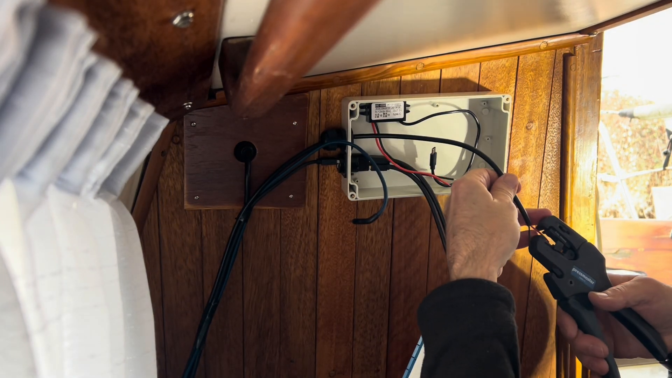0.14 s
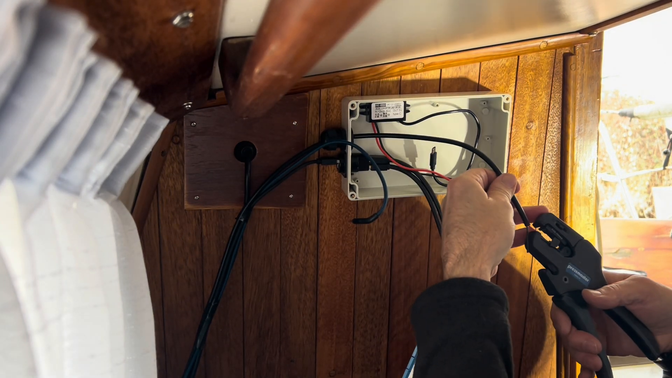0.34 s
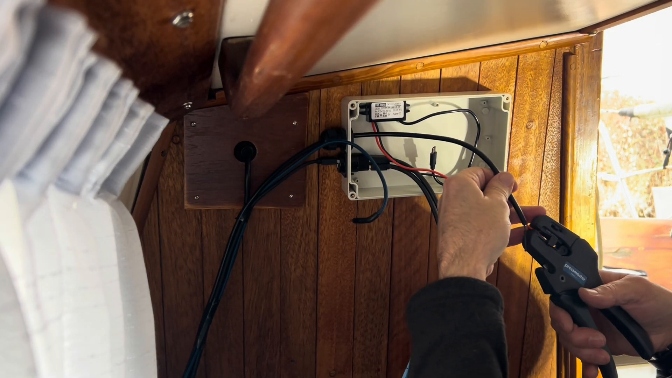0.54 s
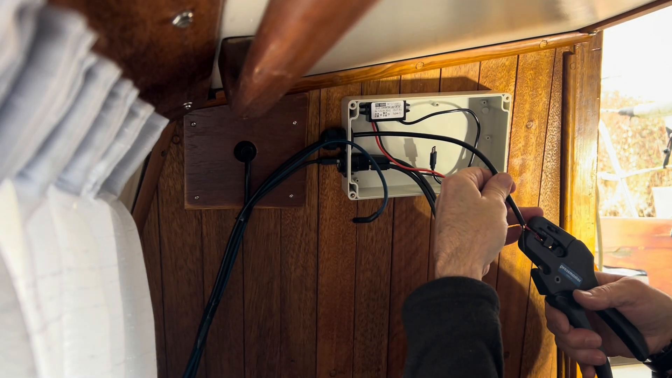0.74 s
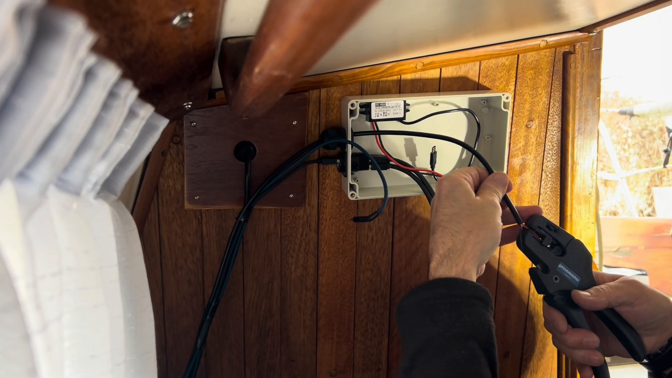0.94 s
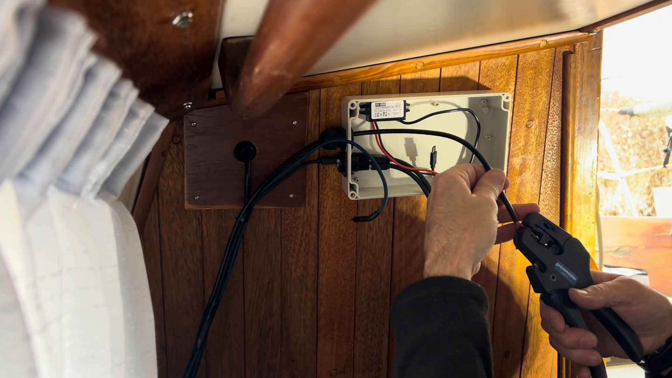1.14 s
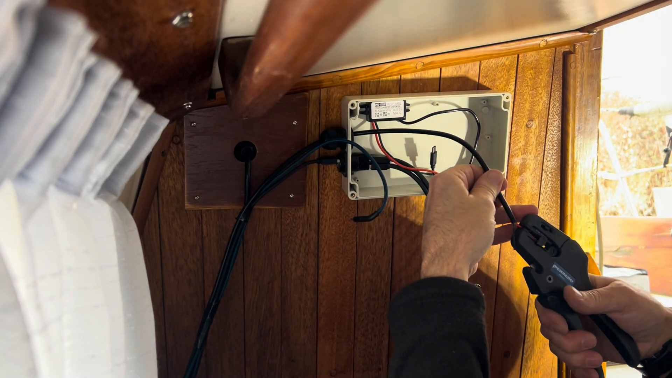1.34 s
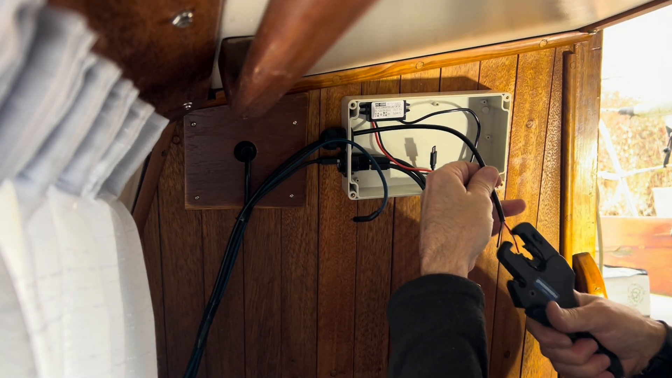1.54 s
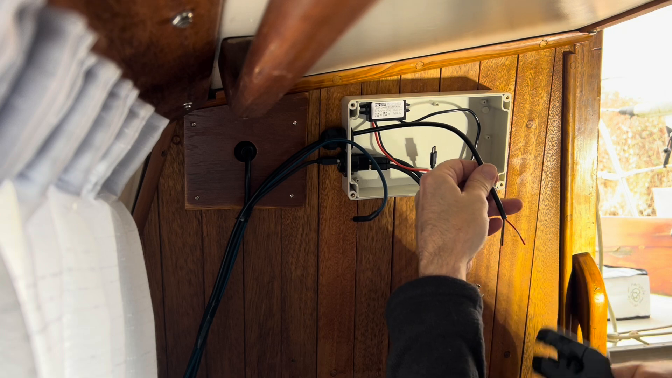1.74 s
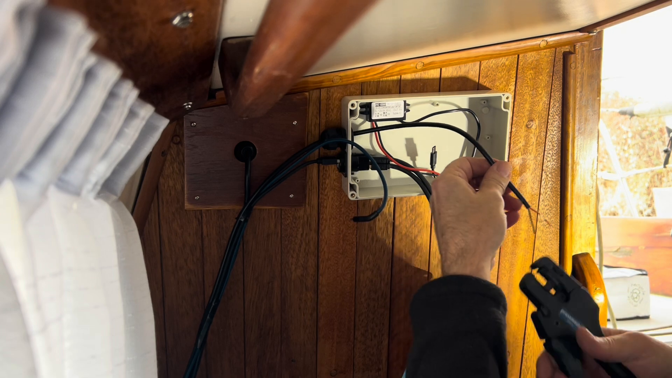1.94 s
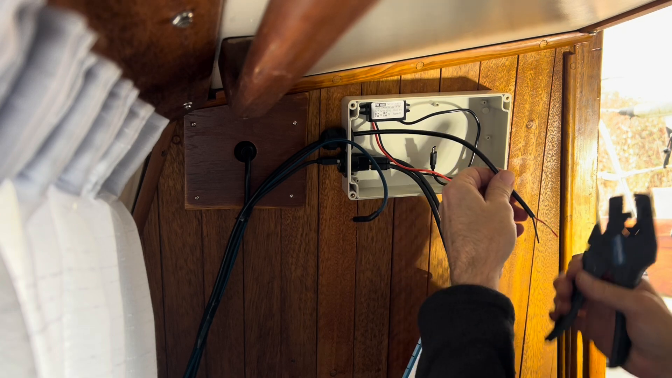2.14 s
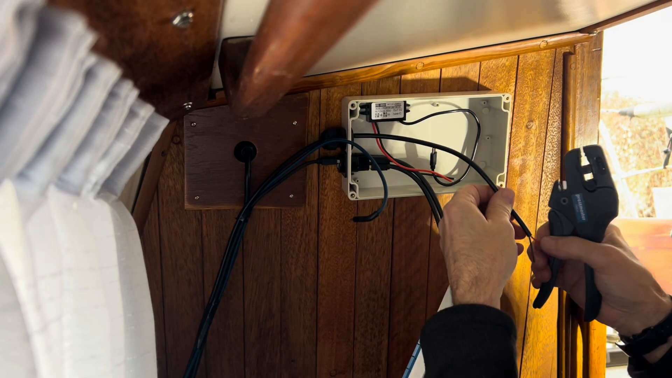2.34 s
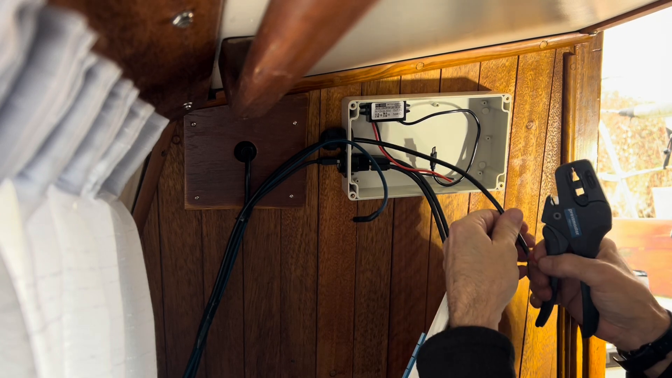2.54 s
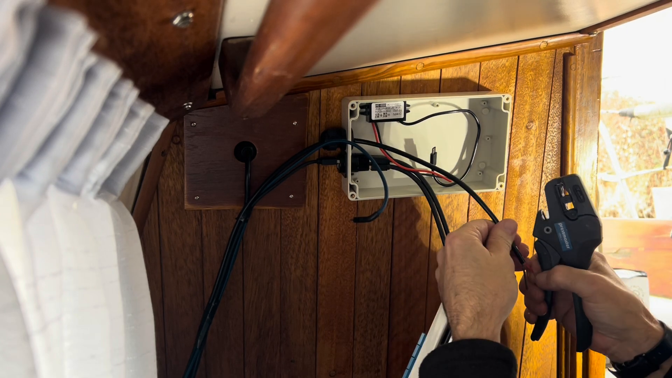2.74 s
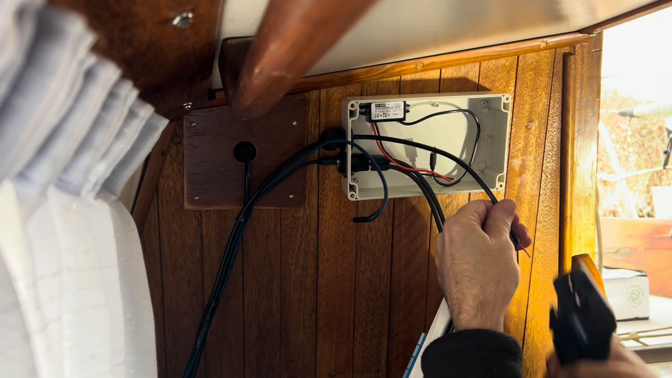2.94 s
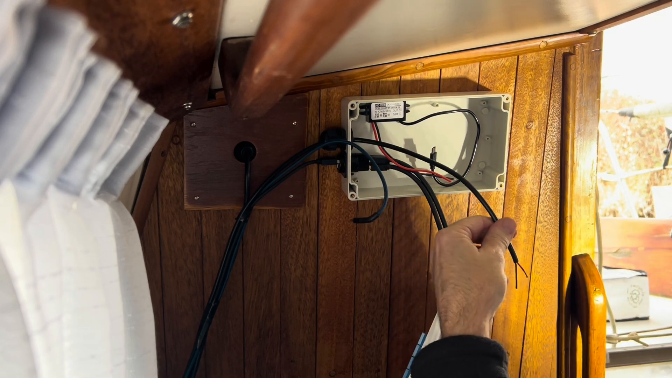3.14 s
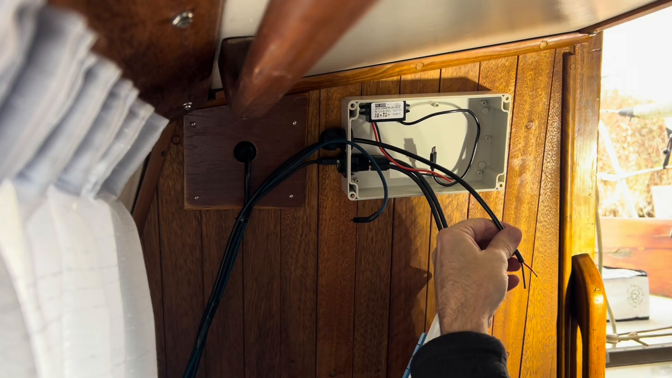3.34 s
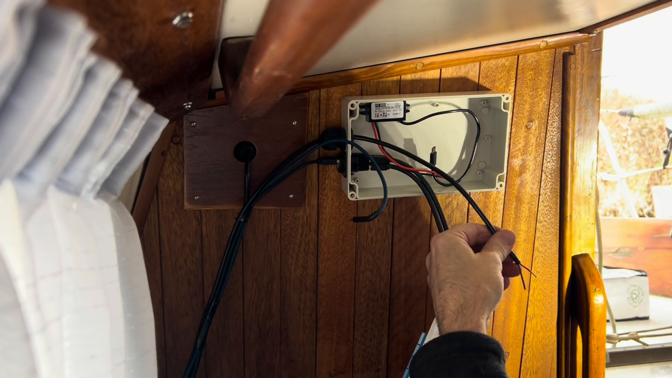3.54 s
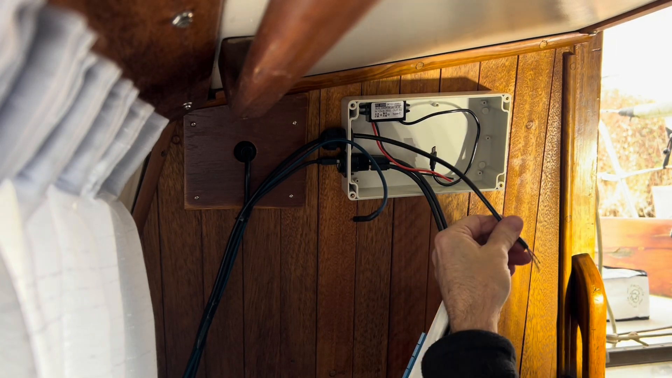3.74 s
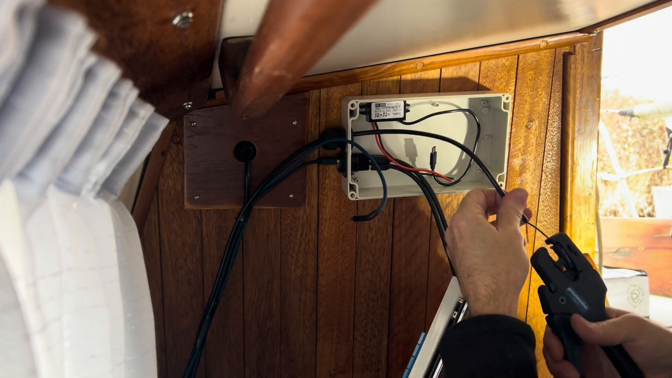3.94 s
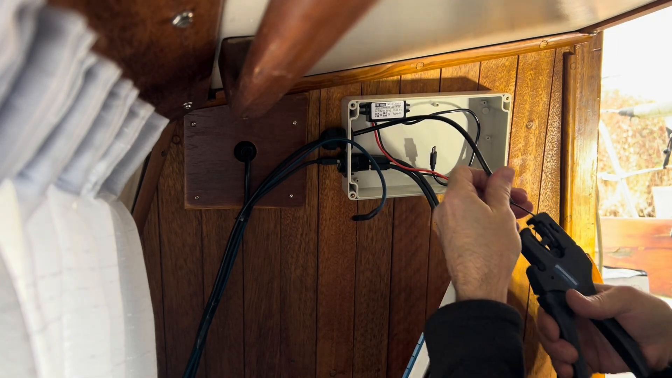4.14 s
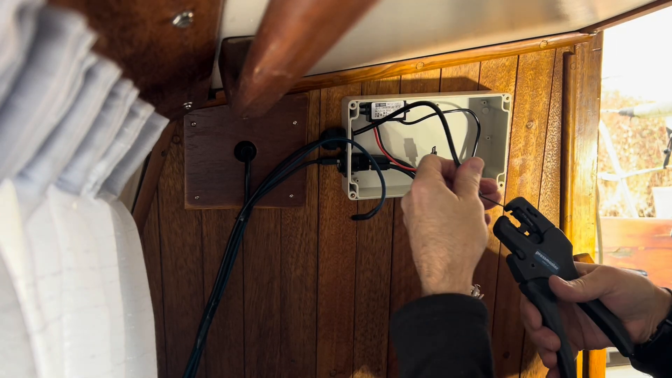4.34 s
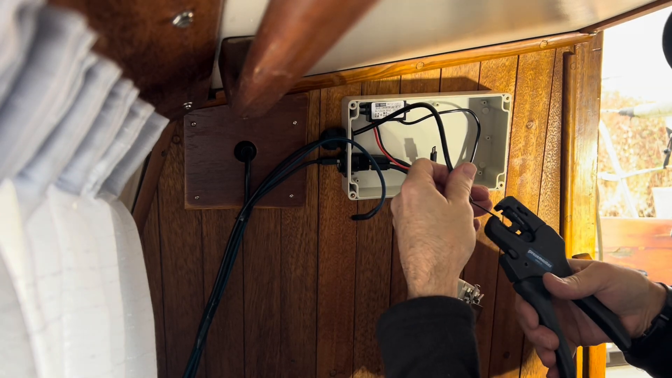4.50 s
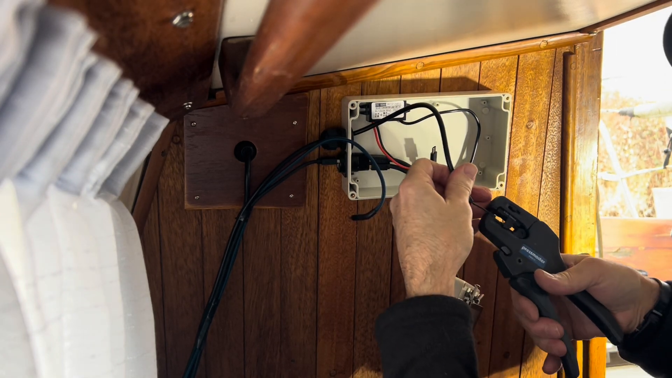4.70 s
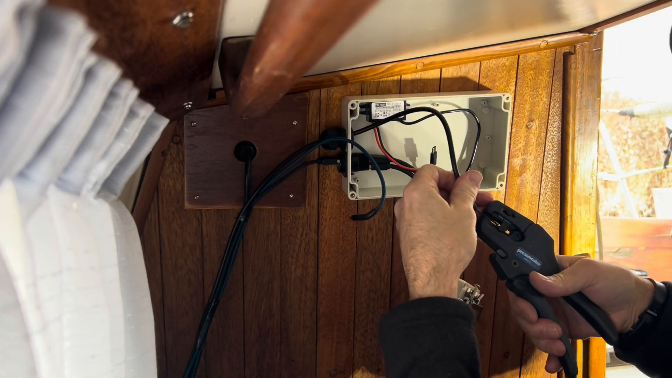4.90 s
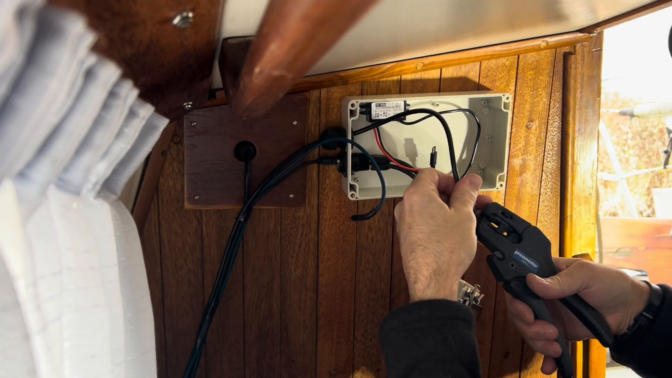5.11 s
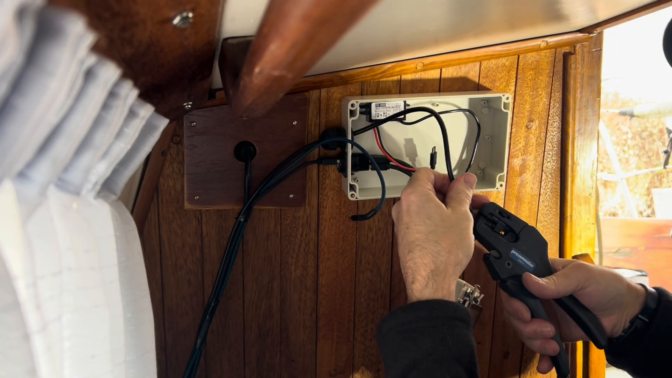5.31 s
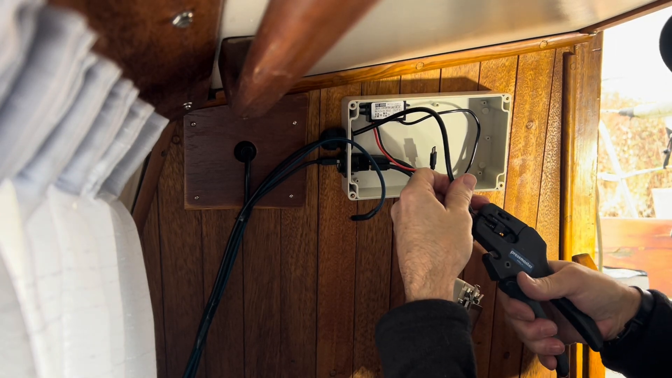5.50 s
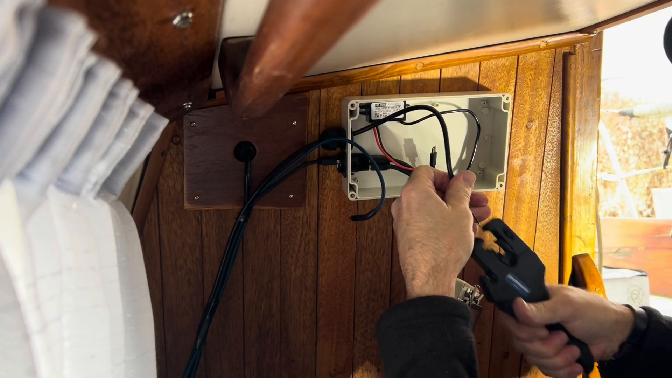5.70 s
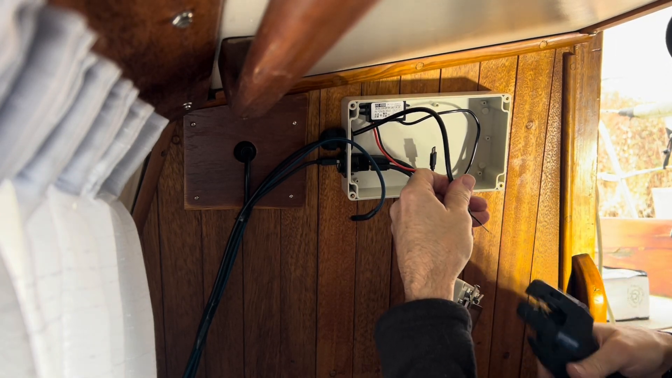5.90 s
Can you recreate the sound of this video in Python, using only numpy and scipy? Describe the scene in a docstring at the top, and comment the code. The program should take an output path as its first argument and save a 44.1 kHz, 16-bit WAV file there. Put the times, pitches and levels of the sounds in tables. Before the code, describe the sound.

Two pairs of hard, bright tool snaps with small ticks and light scrapes between them, above deep engine hum and soft airy hiss.

```python
"""Small wooden boat cabin: a hand wire stripper of steel and plastic clamps, snaps and springs open twice.
Its snaps and the ticks of levers and cable ends are noise bursts ringing modes; sliding is grainy noise through
the same modes; the return spring squeaks. Far machinery hums through the hull (wavering tones, shaped noise), a
small fan hisses by the left microphone port, water and town wash faintly through the hatch (coloured noise),
and a bird chirps once outside (swept sine)."""
import sys
import numpy as np
from scipy import signal
from scipy.fft import rfft, irfft, next_fast_len
from scipy.io import wavfile
from scipy.ndimage import map_coordinates

SR = 44100
rng = np.random.default_rng(int(sys.argv[2]) if len(sys.argv) > 2 else 0)


def put_to_file(sound):
    """Save the sound as 16-bit audio at rate SR, in the file named by the first command-line argument."""
    columns = np.atleast_2d(sound).T  # one column per channel
    safe = np.clip(columns, -1, 1)
    whole_steps = np.round(safe * 32767)
    wavfile.write(sys.argv[1], SR, whole_steps.astype(np.int16))


N = 262924
TIME_S = np.arange(N) / SR

# modes of the steel jaws: center_hz, width_hz, level_db
JAW_MODES = [(5157, 600, -2.5), (6320, 520, 1), (7100, 1400, -1.5), (7940, 740, 4), (8400, 1200, -1.5)]
# modes of the blade edges: center_hz, width_hz, level_db
EDGE_MODES = [(9500, 900, -4), (10800, 700, -1), (11500, 900, 0), (12400, 900, -4), (13500, 1200, -8),
              (15100, 900, -11)]


def amp(db):
    """Gain of a level in dB."""
    return 10 ** (np.asarray(db) / 20)


def unit(x):
    """x at rms 1."""
    return x / np.sqrt(np.mean(np.abs(x) ** 2) + 1e-20)


def along(points, hz):
    """(Hz, value) points interpolated on a log frequency axis."""
    point_hz, values = np.transpose(points)
    return np.interp(np.log(hz + 1), np.log(point_hz + 1), values)


def curves(rows):
    """One value per sample for each column after the time."""
    time_s, *columns = np.transpose(rows)
    return [np.interp(TIME_S, time_s, column) for column in columns]


def wobble(rate_hz):
    """Smooth random curve with rate_hz knots a second."""
    knots = rng.standard_normal(int(N * rate_hz / SR) + 4)
    return map_coordinates(knots, [TIME_S * rate_hz])


def filtered(x, response):
    """x times a complex response of frequency, by padded FFT."""
    size = next_fast_len(x.shape[-1] * 5 // 4)
    spectrum = rfft(x, size) * response(np.fft.rfftfreq(size, 1 / SR))
    return irfft(spectrum, size)[..., :x.shape[-1]]


def resonances(modes, spread_db=0):
    """Sum of damped modes of alternating sign, their strengths scattered at random by spread_db."""
    strengths = amp(spread_db * rng.standard_normal(len(modes)))

    def response(hz):
        total = 0
        for k, (strength, (center_hz, width_hz, db)) in enumerate(zip(strengths, modes)):
            damping = 1j * hz * width_hz
            total = total + (-1) ** k * strength * amp(db) * damping / (center_hz ** 2 - hz ** 2 + damping)
        return total
    return response


def noise(spectrum, channels):
    """Unrelated noises of one colour, rms 1."""
    white = rng.standard_normal((channels, N))
    return unit(filtered(white, lambda hz: amp(along(spectrum, hz))))


def lag(hz):
    """Phase of the travel between ports; none inside the aligned band, above it counted from its top."""
    travel_s, aligned_from_hz, aligned_to_hz = .000262, 1300, 7630
    delayed_hz = np.where(hz < aligned_from_hz, hz, np.maximum(hz - aligned_to_hz, 0))
    return np.exp(-2j * np.pi * delayed_hz * travel_s)


def ports(paths, far_db):
    """Paths from the right end, from the left end and in antiphase, heard at the left and right ports."""
    # antiphase part between the ports: frequency_hz, gain_db
    unlike_gain = [(300, -25.5), (600, 1), (900, -7), (1500, -8), (2000, -1.5), (4000, -9.5), (6000, -2.5),
                   (7500, -14.5), (16000, -17.5)]
    near, far = paths[0], amp(far_db) * paths[1]
    unlike = filtered(paths[2], lambda hz: amp(along(unlike_gain, hz)))
    left = filtered(near, lag) + far + unlike
    right = near + filtered(far, lag) - unlike
    return np.array([left, right])


def cabin(x):
    """Wooden walls answer after a soft gap and mix all directions; a new noise tail every quarter second."""
    # decay of the cabin: frequency_hz, t60_s
    decay = [(500, 0.36), (1500, .15), (4000, 0.15), (10000, 0.11), (16000, 0.086)]
    onset_s = .0071
    out, step = np.zeros((3, N + SR)), SR // 4
    for start in range(0, N, step):
        white = rng.standard_normal((3, len(x), SR // 5))
        hz, t_s, bins = signal.stft(white, SR, nperseg=128)
        fading = bins * amp(-60 * t_s / along(decay, hz)[:, None])
        tail = signal.istft(fading, SR, nperseg=128)[1]
        tail = tail * (1 - np.exp(-(np.arange(tail.shape[-1]) / SR / onset_s) ** 2))
        tail = tail / np.linalg.norm(tail[0])
        wet = signal.fftconvolve(x[None, :, start:start + step], tail, axes=2).sum(axis=1)
        out[:, start:start + wet.shape[1]] += wet
    return out[:, :N]


def tone(rows, waver_db):
    """Sine on a pitch and rms level curve, the level wavering at random."""
    hz, db = curves(rows)
    level = np.sqrt(2) * amp(db + waver_db * wobble(12))
    return level * np.sin(2 * np.pi * np.cumsum(hz) / SR)


def machinery():
    """Two tones over noise that booms in the hull and murmurs in the panels; the right port leads."""
    # main engine tone: time_s, pitch_hz, level_db
    hum = [(0, 97.41, -43), (.4, 99.44, -41.5), (.8, 98.88, -36.5), (.95, 99.4, -39), (1.66, 100.6, -41.5),
           (2.04, 102.3, -40.5), (2.4, 102.2, -45), (2.8, 102.8, -44.5), (3.4, 101.5, -44),
           (3.87, 99.13, -43.5), (4.3, 100.1, -47.5), (5, 97.04, -49.5), (5.3, 100.3, -47),
           (5.55, 101, -53), (5.96, 98.9, -43)]
    # second, weaker tone: time_s, pitch_hz, level_db
    drone = [(0, 124, -82.5), (.9, 125.5, -51.5), (1.5, 122.8, -62), (2.4, 125.5, -50.5),
             (3.05, 126, -58.5), (3.3, 128.2, -50.5), (4.4, 124.1, -51), (5.5, 123.7, -51),
             (5.96, 123.8, -49.5)]
    # boom colour: frequency_hz, level_db_per_hz
    boom_spectrum = [(18, -42), (25, -27), (32, -27), (40, -20), (50, -14), (62, -4), (70, 0), (80, -4),
                     (90, -13), (125, -16), (145, -40), (250, -140)]
    # boom of the hull: time_s, level_db
    hull_level = [(0, -46.5), (.55, -50), (1, -45.5), (1.28, -55.5), (1.41, -39), (1.55, -50), (2, -41),
                  (2.35, -41), (2.65, -41.5), (2.88, -51), (3.35, -41), (3.67, -47), (4.28, -50),
                  (4.4, -45), (5, -47), (5.96, -48.5)]
    # panel modes before the power below: center_hz, width_hz, level_db
    panel_modes = [(137, 33, -0.5), (164, 54, -2), (193.6, 13, 1.5), (232, 27, -3), (256.5, 28, -1.5),
                   (306.7, 20, -4), (353.9, 20, -6.5), (394, 25, -10.5), (488, 49, -10)]
    # murmur of the panels: time_s, level_db
    panel_level = [(0, -45), (.15, -53.5), (.75, -47.5), (1.4, -48.5), (1.88, -52), (1.97, -44.5),
                   (2.16, -47), (2.42, -43.5), (2.95, -51), (3.5, -46.5), (3.6, -51), (4.2, -48.5),
                   (4.63, -52), (4.86, -44), (5.15, -46), (5.45, -53.5), (5.96, -51.5)]
    panels = resonances(panel_modes)
    white = rng.standard_normal((2, N))
    murmur = unit(filtered(white, lambda hz: np.abs(panels(hz)) ** 1.94))
    murmur = amp(curves(panel_level)[0] + 1.5 * wobble(6)) * murmur
    boom = amp(curves(hull_level)[0] + 2.6 * wobble(7.6)) * noise(boom_spectrum, channels=2)
    main, stray = boom + murmur
    main = main + tone(hum, waver_db=1.04) + tone(drone, waver_db=2.5)
    stray = amp(-19) * stray
    return np.array([amp(.4) * filtered(main, lag) + stray, main - stray])


def fan():
    """Air rushes at the left port and leaks, dull and inverted, to the right; two thin blade tones."""
    # rush colour: frequency_hz, level_db_per_hz
    rush_spectrum = [(500, -44), (800, -21.5), (1000, -11), (1200, -1.5), (1400, -1.5), (1650, -3),
                     (1850, -27.5), (2050, -30), (2500, -24), (4250, -30), (4850, -44.5), (6200, -46),
                     (7500, -57), (9000, -79)]
    # blade tones: pitch_hz, peak_level_db
    blade_tones = [(1367, -66.5), (3417, -74.5)]
    rush = amp(-46.0 + 0.47 * wobble(3.5)) * noise(rush_spectrum, channels=1)[0]
    blades = sum(amp(db + 2 * wobble(5)) * np.sin(2 * np.pi * hz * TIME_S) for hz, db in blade_tones)
    left = rush + blades
    leak = filtered(left, lambda hz: -amp(-15) / (1 + (hz / 2200) ** 4))
    return np.array([left, leak])


def air():
    """Far wash of water and town through the hatch: slowly wavering coloured noise."""
    # wash colour: frequency_hz, level_db_per_hz
    wash_spectrum = [(250, -20), (450, -2), (700, -6), (1400, 4), (1700, -7.5), (2000, -18), (3000, -26),
                     (5000, -41), (8000, -43), (12000, -44.5), (14000, -54), (16000, -53.5)]
    return amp(-57.0 + .8 * wobble(4.6)) * ports(noise(wash_spectrum, channels=3), far_db=-5.5)


def body(opening):
    """Modes of the plastic body, squeezed or springing open."""
    # center_hz, width_hz, squeezed_db, opening_db
    body_modes = [(446, 150, -12, -24.5), (880, 220, -15, -21.5), (1600, 170, -5.5, -11),
                  (1935, 80, 2, 3.5), (2224, 170, -2.5, -0.5), (2576, 260, -1.5, -6.5),
                  (3457, 260, -4.5, -2.5), (3800, 394, -1, -7), (4490, 400, -4, -12)]
    return [(hz, width_hz, open_db if opening else shut_db) for hz, width_hz, shut_db, open_db in body_modes]


def snap_contacts():
    """Every snap is a chain of contacts: lead-in, blow, knock of the body, rebound."""
    # blow_s, level_db, lead_in_db, rebound_db, chain (zero: six contacts, any other value: seven)
    snaps = [(1.3975, -8.5, 3.5, -10, 0.0051), (1.6967, -6, 0.5, -4, 1), (5.5836, -11.5, -1.5, 0, 0),
             (5.9224, -9.5, 5, 2.5, 1)]
    # both chains: after_blow_s, jaws_db, body_re_jaws_db, edges_re_jaws_db, length_s
    six_contacts = [(-.0064, -13.5, 1.5, 2.5, .016), (-.0031, -4, -5.5, -9, .016), (0, -2, -7, 9, .008),
                    (.0013, 0, 2, 1, .01), (.0045, -10, 9, -4, .008), (.0175, -9.5, 3.5, -8.5, .007)]
    seven_contacts = [(-.0056, -23.5, 1.5, -6.5, .008), (-.0027, -18.5, 5, -8, .008),
                      (0, -1, -6, 3.5, .006), (.0016, 0, -2.5, -5.5, .008),
                      (.0042, -16.5, 5.5, -14.5, .009), (.0153, -21.5, 14, -8.5, .008),
                      (.0187, -23.5, 10.5, -5, .009)]
    chain_out = []
    for blow_s, db, lead_db, rebound_db, chain in snaps:
        for after_s, step_db, *rest in (seven_contacts if chain else six_contacts):
            level_db = db + step_db + lead_db * (after_s < 0) + rebound_db * (after_s > .01)
            chain_out.append((blow_s + after_s, level_db, *rest))
    return chain_out


def contacts():
    """Each contact is a short rattle of noise ringing jaws, body and edges at new mode strengths."""
    # single ticks of levers and cable ends: start_s, jaws_db, body_re_jaws_db, edges_re_jaws_db
    ticks = [(0.692, -81, -1, 15), (0.9846, -57, 3, -19), (0.9911, -60.5, -5, -25), (1.2897, -62, 4, -3),
             (1.3661, -31.5, 2.5, -3), (1.4675, -35, 10.5, -2.5), (1.499, -46, 1.5, 5),
             (1.5462, -51, 7.5, -12), (1.5979, -61.5, 14, -10), (1.6065, -61, 10, -13),
             (2.374, -40.5, 3, -28.5), (2.3815, -61, -2, -14.5), (2.7672, -59, -10, 7), (3.559, -68, 12, 0),
             (3.7554, -67, 14, -25), (3.8174, -45.5, 2.5, -3.5), (3.823, -54, 2, 6), (3.888, -57.5, 4, -2),
             (4.0084, -52.5, -2, -5), (4.0493, -39.5, -2, 0), (4.171, -58, -14, 1.5), (4.1793, -57, 0, 3),
             (4.2565, -61.5, -12.5, 5), (4.3178, -34.5, -5, -5), (4.4922, -64, 3, -11),
             (4.6525, -67.5, 12.5, -5), (4.7803, -64, 3.5, -8), (5.491, -56.5, 9, 0), (5.505, -51.5, 9, -6),
             (5.5198, -43.5, 3, -9), (5.5565, -49, -5, 2), (5.6772, -43.5, 1, -5), (5.7102, -56, 13, 8),
             (5.8127, -58.5, 12, -12)]
    # spans in which the body rings as opening: start_s, end_s
    opening_spans = [(1.59, 1.9), (5.79, 6)]
    tick_length_s, attack_s = .013, .00025
    out, t_s = np.zeros((3, N + SR)), np.arange(1500) / SR
    events = snap_contacts() + [(*tick, tick_length_s) for tick in ticks]
    for start_s, db, body_db, edges_db, length_s in events:
        envelope = amp(-60 * t_s / length_s) * (1 - np.exp(-t_s / attack_s))
        rattle = rng.standard_normal((3, len(t_s))) * envelope
        plastic = body(any(begin < start_s < end for begin, end in opening_spans))
        span = slice(round(start_s * SR), round(start_s * SR) + len(t_s))
        for modes, part_db in ((JAW_MODES, 0), (plastic, body_db), (EDGE_MODES, edges_db)):
            ring = filtered(rattle, resonances(modes, spread_db=1.5))
            mean_peak = np.abs(ring).max(axis=1).mean()
            out[:, span] += amp(db + part_db - 1.0) * ring / mean_peak
    return out[:, :N]


def slides():
    """Friction of levers, insulation and fingers: grainy noise through the modes, late swell and late fade."""
    # start_s, loudest_s, end_s, level_db, body_db, edges_db
    strokes = [(1.26, 1.385, 1.4, -62.5, -1.5, -6.5), (1.39, 1.413, 1.6, -65, -3, -6),
               (1.6, 1.69, 1.71, -54.5, -1, -2), (2.0, 2.033, 2.075, -77, -6.5, -5.5),
               (2.069, 2.126, 2.17, -84, -7, -1), (2.23, 2.27, 2.33, -84, 1, -5),
               (2.47, 2.516, 2.58, -88, -7, 0.5), (2.751, 2.772, 2.81, -70.5, -8, 5),
               (2.9, 3.0, 3.1, -88, -3, 3), (3.14, 3.177, 3.44, -92.5, -3, 0),
               (3.5, 3.58, 3.72, -78.5, 3.5, -5), (3.8, 3.816, 3.93, -80.5, -3.5, 0.5),
               (3.997, 4.008, 4.025, -62.5, 2.5, -0.5), (4.039, 4.052, 4.075, -61.5, -2, -2),
               (4.161, 4.183, 4.2, -68, -6.5, 3), (5.45, 5.516, 5.6, -63.5, 3, 4),
               (5.58, 5.599, 5.76, -67, -0.5, 1.5), (5.79, 5.918, 5.93, -56.5, 0.5, -0.5)]
    range_db, swell_power, fade_power, grain_db = 32.5, 1.5, 3.5, 4
    out, grain = np.zeros((3, N)), wobble(400) + 0.5 * wobble(45)
    for start_s, top_s, end_s, db, body_db, edges_db in strokes:
        span = slice(round(start_s * SR), round(end_s * SR))
        t_s = TIME_S[span]
        swell = np.clip((top_s - t_s) / (top_s - start_s), 0, 1) ** swell_power
        fade = np.clip((t_s - top_s) / (end_s - top_s), 0, 1) ** fade_power
        grit = amp(grain_db * grain[span]) * rng.standard_normal(out[:, span].shape)
        parts = ((body(False), body_db), (JAW_MODES, 0), (EDGE_MODES, edges_db))
        rubbed = sum(amp(part_db) * unit(filtered(grit, resonances(modes))) for modes, part_db in parts)
        out[:, span] += amp(db - range_db * (swell + fade)) * rubbed
    return out


def squeaks():
    """Return spring as the handles ease back: rough narrow rings at its pitch and octave."""
    # start_s, end_s, pitch_hz, level_db
    spring_squeaks = [(1.499, 1.503, 4142, -51), (1.535, 1.578, 4000, -61), (5.694, 5.741, 4040, -66)]
    out = np.zeros((3, N))
    for start_s, end_s, hz, db in spring_squeaks:
        span = slice(round(start_s * SR), round(end_s * SR))
        slip = rng.standard_normal(out[:, span].shape) * np.hanning(span.stop - span.start) ** .3
        out[:, span] = amp(db) * unit(filtered(slip, resonances([(hz, 200, 0), (2 * hz, 300, -4)])))
    return out


def stripper():
    """The tool on the right: direct sound plus the cabin's answer."""
    tool = contacts() + slides() + squeaks()
    direct = amp(1.0) * ports(tool, far_db=-13)
    reverberant = amp(-11.0) * ports(cabin(tool), far_db=-4)
    return (direct + reverberant) * amp([[-.6], [.6]])


def bird():
    """One thin chirp, up and down, rough by pitch and level jitter, with a late weak overtone."""
    # time_s, pitch_hz, level_db
    chirp = [(5.235, 3670, -90), (5.25, 3900, -73), (5.262, 4460, -65), (5.272, 4920, -70),
             (5.28, 4340, -64), (5.29, 3800, -66), (5.3, 3760, -70), (5.31, 3900, -73), (5.32, 3700, -90)]
    hz, db = curves(chirp)
    phase = 2 * np.pi * np.cumsum(hz + 70 * wobble(300)) / SR
    sings = (TIME_S > chirp[0][0]) * (TIME_S < chirp[-1][0])
    overtone = amp(-24.5) * (TIME_S > 5.283) * np.sin(2 * phase)
    call = amp(db + 2.5 * wobble(220)) * sings * (np.sin(phase) + overtone)
    return call + amp(-3) * cabin(call[None])[:2]


def scene():
    """All sources at the two ports."""
    return machinery() + fan() + air() + stripper() + bird()


def record(dry):
    """Steep low-pass at the band limit of the microphone ports."""
    top_hz = 15800
    return filtered(dry, lambda hz: 1 / (1 + (hz / top_hz) ** 80))


dry = scene()
out = record(dry)
put_to_file(out)
```